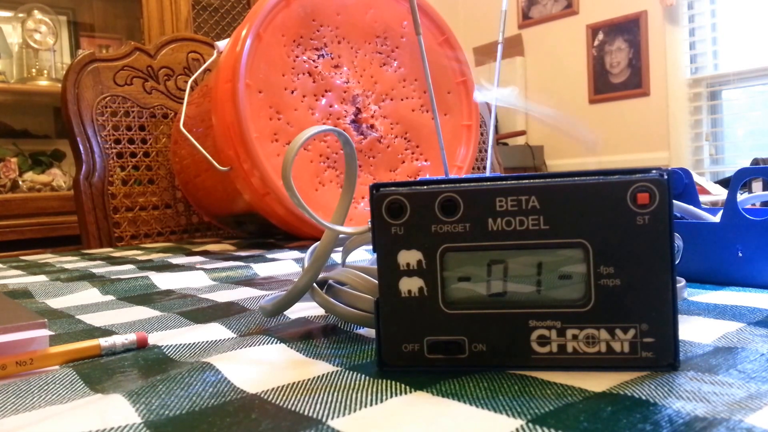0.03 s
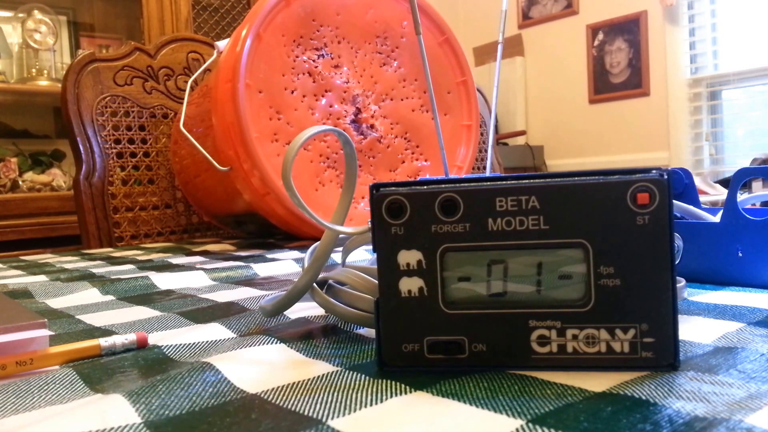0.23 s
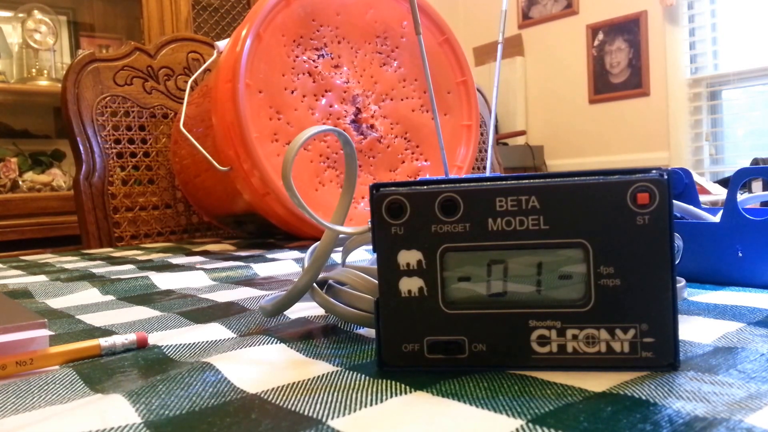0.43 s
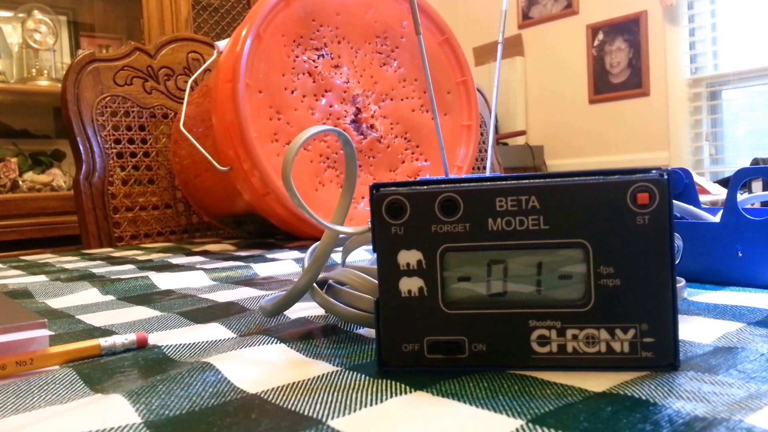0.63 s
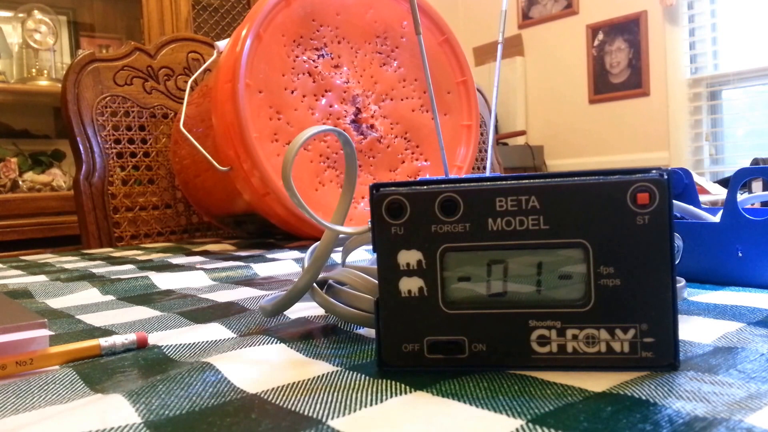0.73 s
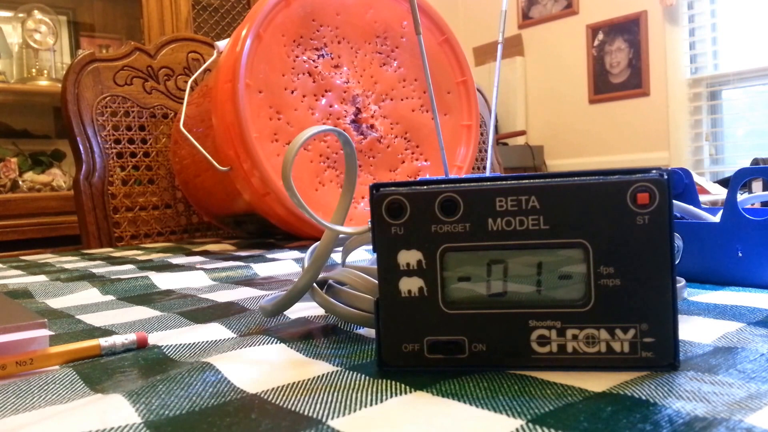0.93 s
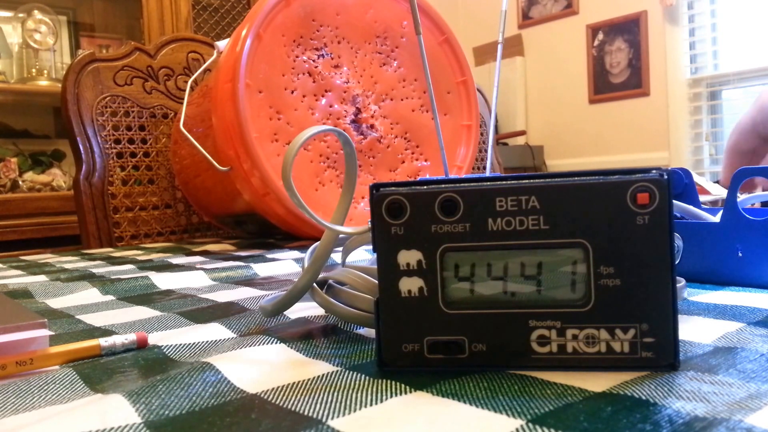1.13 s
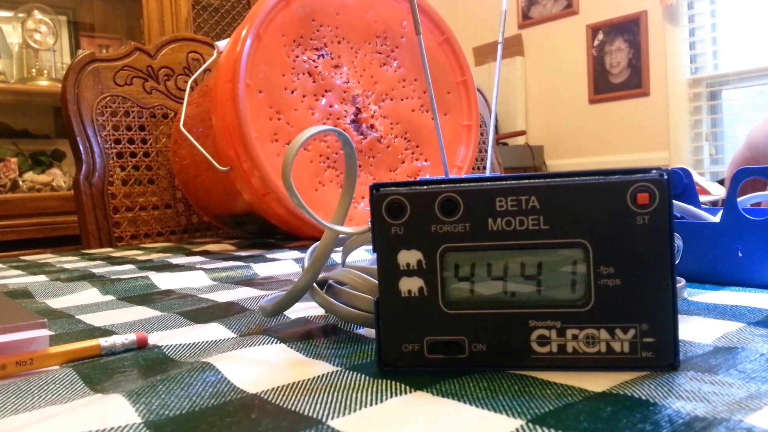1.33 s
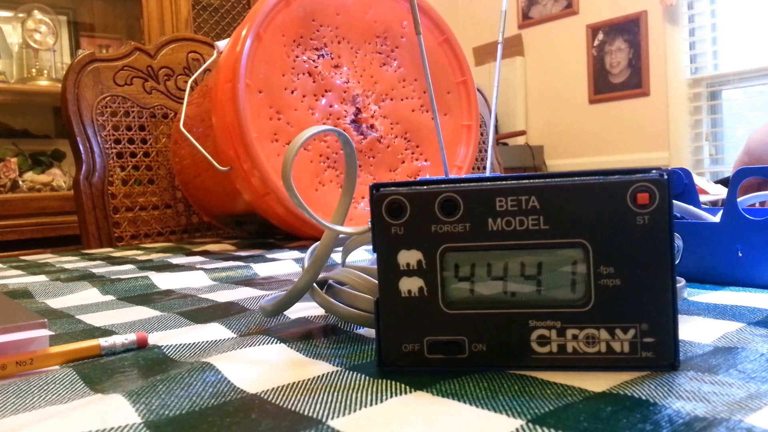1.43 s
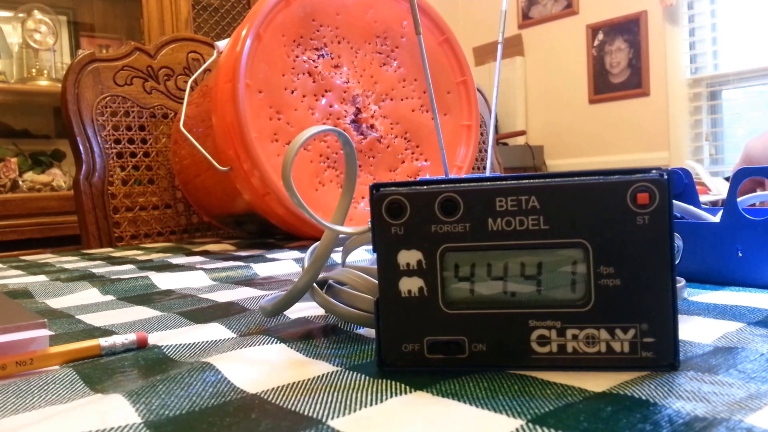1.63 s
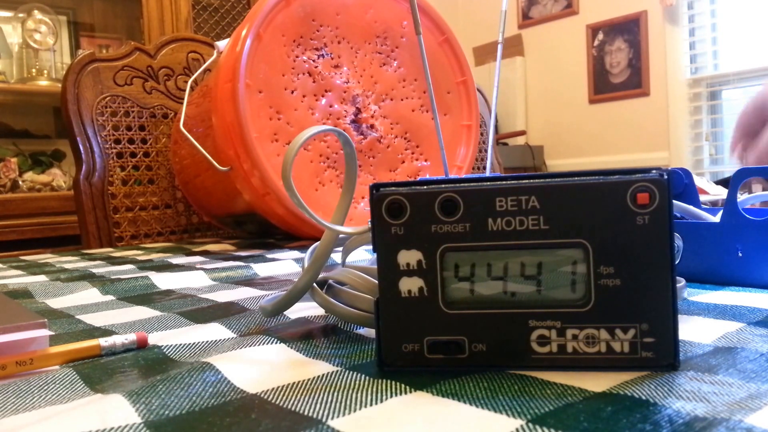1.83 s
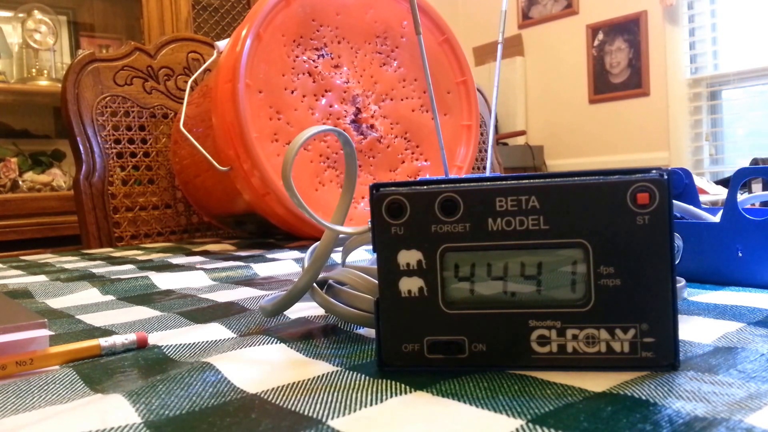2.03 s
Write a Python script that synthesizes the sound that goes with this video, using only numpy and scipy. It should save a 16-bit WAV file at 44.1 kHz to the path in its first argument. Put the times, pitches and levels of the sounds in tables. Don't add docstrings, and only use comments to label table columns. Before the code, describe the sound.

A stretched rubber band lets go and cracks against a plastic bucket right at the start, clattering briefly with a short room tail, then soft rustling, a faint hollow slide and tiny clicks over low room rumble and hiss.

```python
import sys
import numpy as np
from scipy import signal
from scipy.fft import rfft, irfft, next_fast_len
from scipy.io import wavfile
from scipy.ndimage import uniform_filter1d, map_coordinates

SR = 44100
rng = np.random.default_rng(int(sys.argv[2]) if len(sys.argv) > 2 else 0)


def int16_out(signal):
    q = np.round(np.clip(np.atleast_2d(signal).T, -1, 1) * 32767)
    wavfile.write(sys.argv[1], SR, q.astype(np.int16))


def undo_db(level):
    steps = np.asarray(level, float) / 20
    return 10 ** steps


N = 91198


def unit(x):
    return x / np.sqrt(np.mean(x ** 2) + 1e-20)


def peak(x):
    return x / np.abs(x).max()


def along(points, hz):
    f, value = np.transpose(points)
    return np.interp(np.log(hz + 1), np.log(f + 1), value)


def level_curve(rows):
    s, db = np.transpose(rows)
    return np.interp(np.arange(N) / SR, s, db)


def wobble(rate_hz):
    knots = rng.standard_normal(int(N * rate_hz / SR) + 4)
    return map_coordinates(knots, [np.arange(N) * rate_hz / SR])


def filtered(x, response):
    n = x.shape[-1]
    m = next_fast_len(n + 8192)
    return irfft(rfft(x, m) * response(np.fft.rfftfreq(m, 1 / SR)), m)[..., :n]


def resonances(modes):
    def response(f):
        total = 0
        for k, (hz, width_hz, db) in enumerate(modes):
            band = 1j * f * width_hz
            total = total + (-1) ** k * undo_db(db) * band / (hz * hz - f * f + band)
        return total
    return response


def detuned(modes, tilt_db):
    return [(hz * (1 + 0.01 * rng.standard_normal()), width_hz,
             db + tilt_db * np.log2(hz / 3000) + rng.standard_normal()) for hz, width_hz, db in modes]


# hz, level_db
AIR_CRACK = [(300, -35.5), (2000, -14.5), (5000, -6), (9000, -2), (14000, -2.5), (16000, -23.5)]


def contacts(rows, shell, body, t60_s, blow):
    out = np.zeros((2, N + 2 * SR))
    t = np.arange(SR // 8) / SR
    fade = np.array([undo_db(-60 * t / d) * (1 - np.exp(-22 * t / d)) for d in t60_s])
    impulse = blow * (t == 0)
    for s, click_db, drum_db, air_db, tilt_db in rows:
        scuff = rng.standard_normal((2, len(t))) * fade[:2]
        shell_scuff, body_scuff = scuff / np.linalg.norm(scuff, axis=1, keepdims=True)
        click = filtered(shell_scuff + impulse, resonances(detuned(shell, tilt_db)))
        drum = filtered(body_scuff + impulse, resonances(detuned(body, 0)))
        drum = filtered(drum, lambda f: 1 / (1 + 1j * f / 1500))
        crack = filtered(rng.standard_normal(len(t)), lambda f: undo_db(along(AIR_CRACK, f))) * fade[2]
        dry_hit = undo_db(click_db) * peak(click) + undo_db(drum_db) * peak(drum) + undo_db(air_db) * peak(crack)
        hit = heard(dry_hit)
        out[:, round(s * SR):][:, :hit.shape[1]] += hit
    return out[:, :N]


HARD_T60_S = [0.02, 0.0059, 0.0071]
SOFT_T60_S = [0.1, 0.027, 0.038]
# hz, width_hz, level_db
SHELL = [(1230, 270, -7), (1833, 170, -2.5), (2265, 300, -1), (3236, 425, 3.5), (4200, 516, 1.5),
         (5040, 1700, -10), (11200, 510, -31)]
# hz, width_hz, level_db
BUCKET = [(351, 146, -9), (433, 30, -5), (518.6, 78, -3.5), (605.4, 57, -1), (725, 47, -1),
          (916, 170, -6.5), (1295, 150, -10.5), (1525, 51, -12.5)]
# hz, width_hz, level_db
BUCKET_FLOOR = [(431.3, 18, 13.5), (528, 68, 2.5), (729, 36, 5.5), (950, 60, 3), (1176, 28, -1.5)]
# hz, width_hz, level_db
BUCKET_RIM = [(2400, 300, -9), (3200, 480, 0), (4220, 450, 3), (5400, 700, -16), (11000, 900, -16)]
# hz, width_hz, level_db
BUCKET_WALL = [(546, 70, 0), (1210, 110, -14.5)]
# hz, width_hz, level_db
CATCH_MODE = [(143.3, 25, 0)]
# start_s, click_db, drum_db, crack_db, tilt_db_per_octave
CATCH_JOLT = [
    (.04, -63.5, -28, -63.5, 0.02),
]
# start_s, click_db, drum_db, crack_db, tilt_db_per_octave
BAND_STRIKES = [
    (.0475, -15, -23.5, -16.5, -4),
    (.0497, -10.5, -19, -19.5, -4.5),
    (.0535, -6.5, -18.5, -25, -7),
    (.0552, -14, -21.5, -25, 1),
                (0.0257, -28.5, -31.5, -39, 1), (0.0307, -18.5, -25.5, -23.5, 0),
             (0.0348, -15, -18, -15.5, -1), (.059, -15, -23.5, -40, 2), (.065, -15, -23.5, -37.5, -9),
             (.071, -21.5, -27.5, -20.5, -9.5), (0.0774, -11, -22.5, -37, -1), (.0858, -8, -21.5, -43.5, 0),
             (0.113, -7, -28, -30, 3), (0.1161, -14.5, -23.5, -33.5, 6), (0.125, -16.5, -34, -35, 1.5),
             (0.1273, -12.5, -36, -37.5, -1), (0.1287, -11.5, -41.5, -37.5, 2.5),
             (.136, -20, -31, -43.5, 1), (.143, -24.5, -27, -43.5, -7.5)]
# start_s, click_db, drum_db, crack_db, tilt_db_per_octave
RIM_WHIP = [
    (.1097, -5.5, -26, -22, 0),
    (.11065, -5.5, -28, -24, 0),
]
# start_s, click_db, drum_db, crack_db, tilt_db_per_octave
WALL_KNOCK = [
    (.111, -60, -15, -60, 0),
]
# start_s, click_db, drum_db, crack_db, tilt_db_per_octave
FLOOR_DROP = [
    (.1682, -16, -13, -39, -6.5),
    (.184, -18.5, -26, -54, -8),
    (.204, -22.5, -23, -52, -3),
    (.242, -30, -31, -48.5, -5),
    (.271, -28, -31, -46, 0),
]
# start_s, click_db, drum_db, crack_db, tilt_db_per_octave
SLACK_FLOP = [
    (.296, -30, -45, -39.5, -2.5),
    (.312, -31, -37.5, -44, 9.5),
    (.345, -52, -37.5, -67, 9),
    (.462, -46.5, -43.5, -67, 3),
]


def band_on_bucket():
    hits = contacts(BAND_STRIKES, SHELL, BUCKET, HARD_T60_S, blow=1.5)
    hits = hits + contacts(CATCH_JOLT, SHELL, CATCH_MODE, SOFT_T60_S, blow=1.5)
    hits = hits + contacts(RIM_WHIP, BUCKET_RIM, BUCKET, HARD_T60_S, blow=4)
    hits = hits + contacts(WALL_KNOCK, SHELL, BUCKET_WALL, HARD_T60_S, blow=4)
    hits = hits + contacts(FLOOR_DROP, SHELL, BUCKET_FLOOR, HARD_T60_S, blow=4)
    return hits + contacts(SLACK_FLOP, SHELL, BUCKET, SOFT_T60_S, blow=0.1)


# hz, width_hz, level_db
SMALL_THINGS = [(1000, 240, 2.5), (1960, 700, 2), (3360, 390, 7), (4560, 660, 0)]
# hz, width_hz, level_db
TABLE_TOP = [(253, 84, 5), (503, 200, 7), (800, 300, 3)]
# start_s, click_db, drum_db, crack_db, tilt_db_per_octave
TABLE_TICKS = [(.998, -65, -65, -77, -1.5), (1.404, -36.5, -56, -64, -2.5), (1.5755, -50, -62, -58.5, -13),
               (1.5788, -35.5, -62, -48, 0), (1.5808, -28, -58, -34, -1.5), (1.5885, -46, -65, -50, 2),
               (1.5925, -33, -69, -47, -2.5), (1.598, -37.5, -55, -48, 3), (1.61, -41.5, -61, -46, -3),
               (1.667, -44, -66, -53, 4), (1.7548, -27.5, -49, -38, 3.5), (1.7585, -37, -37, -57, 3),
               (1.769, -36.5, -33.5, -47, 5), (1.778, -40, -36.5, -45, 0), (1.788, -42, -38.5, -47, 0)]
# start_s, click_db, drum_db, crack_db, tilt_db_per_octave
CLOTH_PRESSES = [
    (.765, -48, -40.5, -68, -6),
    (.79, -50.5, -41.5, -62.5, -6),
    (.88, -54, -42.5, -72, -3),
    (1.355, -43.5, -42, -70, -10),
    (1.435, -47.5, -41, -64, 0),
    (1.688, -40, -61, -45.5, 2),
]


def table_contacts():
    ticks = contacts(TABLE_TICKS, SMALL_THINGS, TABLE_TOP, HARD_T60_S, blow=0.8)
    return ticks + contacts(CLOTH_PRESSES, SMALL_THINGS, TABLE_TOP, SOFT_T60_S, blow=0.1)


def stroke(start_s, length_s, db):
    grip_s = 0.02
    t = np.arange(N) / SR - start_s
    return undo_db(db) * np.clip(t / grip_s, 0, 1) * np.clip((length_s - t) / grip_s, 0, 1)


# start_s, length_s, level_db, first_hz, sag_hz
HUM_STROKES = [
    (1.039, 0.11, -53.5, 275, -10),
    (1.141, 0.12, -44, 350, 62),
    (1.236, 0.088, -45, 266.7, -11.5),
    (1.339, 0.098, -44.5, 321, 22.5),
    (1.418, 0.055, -49.5, 275.6, 15),
    (1.465, 0.097, -48.5, 315, 20),
    (0.806, 0.037, -45.5, 348.2, 15),
]
# hz, width_hz, level_db
DRAGGED_EDGE = [(2280, 350, -1.5), (4500, 1200, -3.5)]
# start_s, length_s, level_db
EDGE_RUBS = [
    (1.107, 0.19, -60),
    (0.645, 0.233, -62.5),
    (1.36, .1, -61),
]


def slide():
    sag_s, width_hz, overtone_db = 0.06, 30, -14
    t = np.arange(N) / SR
    hum = 0
    for start_s, length_s, db, first_hz, sag_hz in HUM_STROKES:
        grip = filtered(rng.standard_normal((2, N)), lambda f: 1 / (1 + (f / width_hz) ** 2))
        pitch_hz = first_hz - sag_hz * np.clip((t - start_s) / sag_s, 0, 1)
        phase = 2 * np.pi * np.cumsum(pitch_hz) / SR
        tone = (unit(grip[0]) + 4) * np.cos(phase) + unit(grip[1]) * np.sin(phase)
        tone = tone + undo_db(overtone_db) * np.cos(2 * phase)
        hum = hum + unit(tone) * stroke(start_s, length_s, db)
    edge = resonances(DRAGGED_EDGE)
    rub = unit(filtered(rng.standard_normal(N), lambda f: edge(f) ** 2))
    rub = rub * sum(stroke(*row) for row in EDGE_RUBS)
    return heard(hum + rub, room_db=-10)[:, :N] * undo_db(-1.0)


# hz, t60_s
ROOM_T60 = [(200, 0.14), (450, 0.45), (750, 0.38), (3000, 0.27), (8000, .4), (14000, 0.16)]
# hz, level_db
ROOM_LEVEL = [(200, 0), (450, 0.5), (750, -2), (1500, -1), (3000, 0), (8000, 3), (14000, 1.5)]
# hz, share
ROOM_SHARE = [(300, 1), (1500, 0.46), (8000, 0.024)]


def heard(x, room_db=0):
    hz, t, z = signal.stft(rng.standard_normal((3, SR * 5 // 8)), SR, nperseg=256)
    share = np.clip(along(ROOM_SHARE, hz), 0, 1)[:, None]
    z = np.sqrt(share) * z[2] + np.sqrt(1 - share) * z[:2]
    z = z * undo_db(-60 * t / along(ROOM_T60, hz)[:, None])
    z = z / np.sqrt(np.mean(abs(z) ** 2, axis=(0, 2), keepdims=True))
    flat = np.linalg.norm(signal.istft(z[0], SR, nperseg=256)[1])
    tail = signal.istft(z * undo_db(along(ROOM_LEVEL, hz))[:, None], SR, nperseg=256)[1] / flat
    delayed = np.pad(x, (round(0.0034 * SR), 0))
    wet = undo_db(room_db) * signal.fftconvolve(delayed[None], tail, axes=1)
    return wet + np.pad(x, (0, wet.shape[1] - len(x)))


# hz, left_over_right_db
PORT_LEAN = [(300, -1.5), (1500, 1.5), (4000, -3.5), (12000, -2)]
# hz, left_lead_rad
PORT_LEAD = [(60, .1), (300, .45), (1000, 1.1), (2000, 1.5), (3300, .8), (4300, .7), (8000, 1.4),
             (14000, 1.3)]


def microphones(near):
    def ports(f):
        bass = 1j * f / 145
        thin = (bass / (1 + bass)) ** 2
        half_lean_db, half_lead_rad = along(PORT_LEAN, f) / 2, along(PORT_LEAD, f) / 2
        return thin * np.array([undo_db(side * half_lean_db) * np.exp(1j * side * half_lead_rad) for side in (1, -1)])
    return filtered(near, ports)


# hz, left_right_likeness
LIKENESS = [(60, 0.39), (240, 0.72), (950, -0.069), (3770, -0.2), (15000, -0.017)]


def rush(spectrum, patchy_db):
    z = signal.stft(rng.standard_normal((2, N)), nperseg=512)[2]
    field = uniform_filter1d(rng.standard_normal(z.shape[1:]), size=5, axis=0)
    field = uniform_filter1d(field, size=8, axis=1)
    pair = signal.istft(z * undo_db(patchy_db * unit(field)), nperseg=512)[1][:, :N]

    def mid_side(f):
        angle = np.arccos(np.clip(along(LIKENESS, f), -1, 1)) / 2
        return undo_db(along(spectrum, f)) * np.array([np.cos(angle), np.sin(angle)])
    mid, side = filtered(pair, mid_side)
    return unit(np.array([mid + side, mid - side]))


# time_s, level_db
RUSTLE_LEVEL = [(0.4, -56.5), (0.46, -60), (0.648, -58.5), (0.894, -65), (1.162, -63.5), (1.328, -57),
                (1.578, -58.5), (1.68, -54.5), (1.86, -60.5), (2.06, -82)]
# hz, level_db_per_hz
CLOTH_SPECTRUM = [(290, -25), (500, -7), (2010, -13.5), (2240, -10), (3590, -11.5), (6490, -22),
                  (9000, -21.5), (11700, -24), (19800, -120)]


def rustle():
    quiet_db = -74.5
    over = np.sqrt(np.clip(undo_db(level_curve(RUSTLE_LEVEL)) ** 2 - undo_db(quiet_db) ** 2, 0, None))
    grain_db = 0.4 * wobble(98) + 0.43 * wobble(360)
    return undo_db(4 + grain_db) * over * rush(CLOTH_SPECTRUM, patchy_db=0.7)


# hz, level_db_per_hz
HOUSE_SPECTRUM = [(12, -71.5), (40, -17.5), (120, -7), (290, -1), (520, -8), (1500, -20), (5000, -25),
                  (6500, -29.5), (13900, -24), (15900, -35)]
# time_s, level_db
HOUSE_LEVEL = [(0.0, -51.5), (2.06, -53)]


def house():
    floor = rush(HOUSE_SPECTRUM, patchy_db=0.2)
    low = filtered(floor, lambda f: 1 / (1 + (f / 900) ** 2))
    lumps = undo_db(0.66 * wobble(36)) - 1
    return undo_db(level_curve(HOUSE_LEVEL)) * (floor + low * lumps)


def scene():
    near = band_on_bucket() + table_contacts() + slide()
    return microphones(near) + rustle() + house()


def band_limit(x):
    return signal.sosfilt(signal.butter(12, 16090, fs=SR, output="sos"), x)


def record(dry):
    top_hz, fall_hz = 14900, 300
    mix = filtered(dry, lambda f: 1 / (1 + np.exp(np.clip((f - top_hz) / fall_hz, -50, 50))))
    return band_limit(mix)


dry = scene()
out = record(dry)
int16_out(out)
```